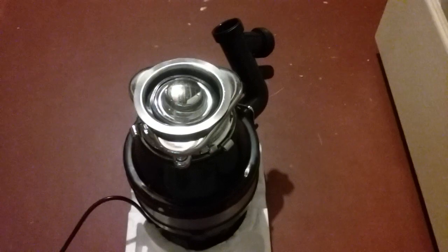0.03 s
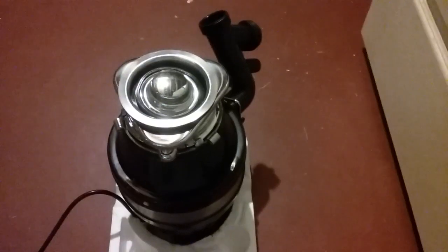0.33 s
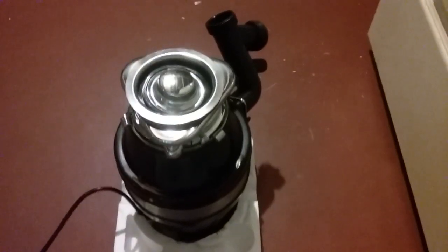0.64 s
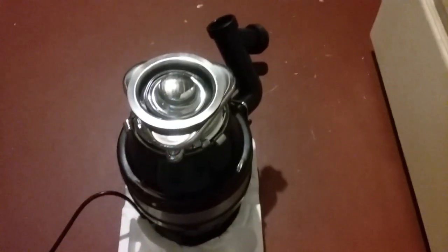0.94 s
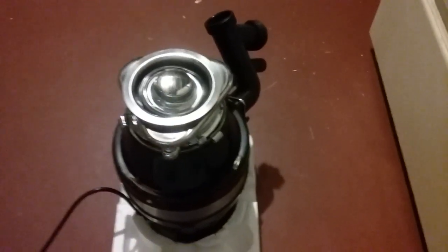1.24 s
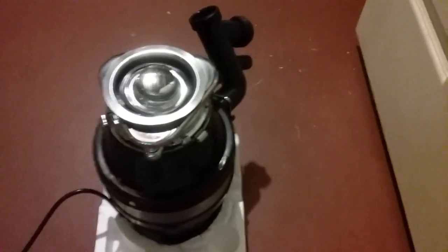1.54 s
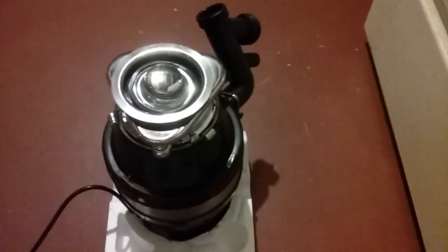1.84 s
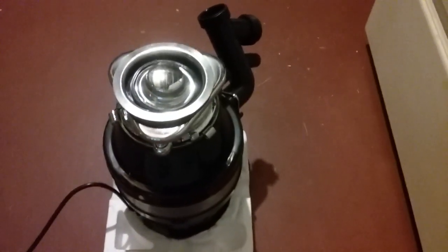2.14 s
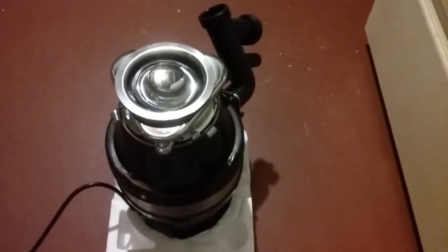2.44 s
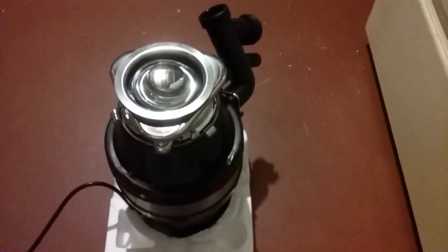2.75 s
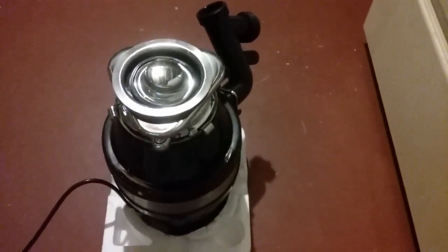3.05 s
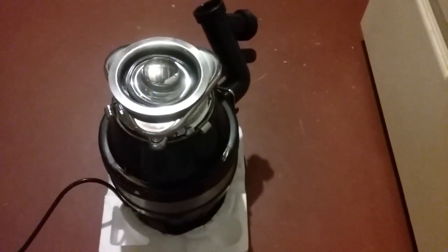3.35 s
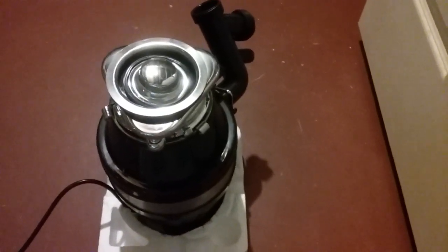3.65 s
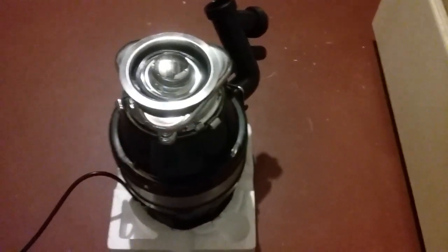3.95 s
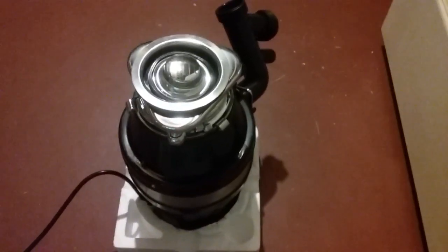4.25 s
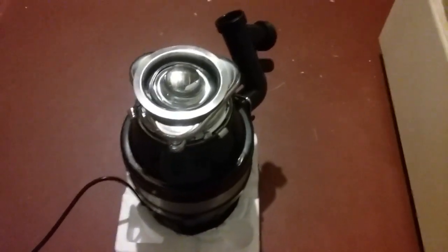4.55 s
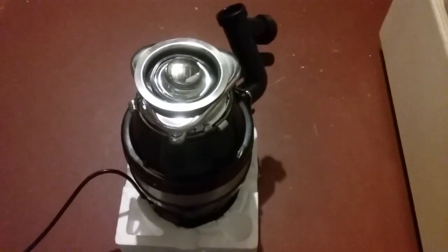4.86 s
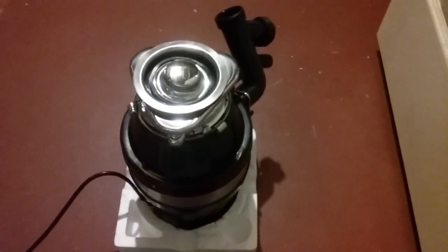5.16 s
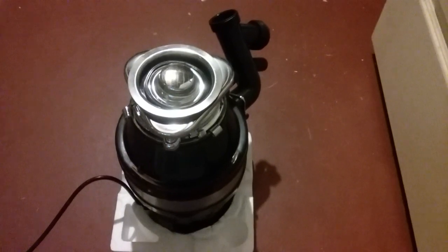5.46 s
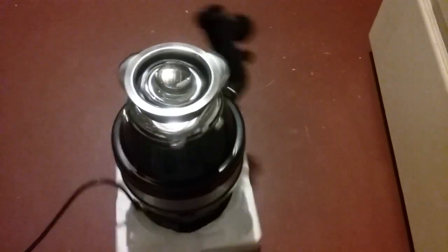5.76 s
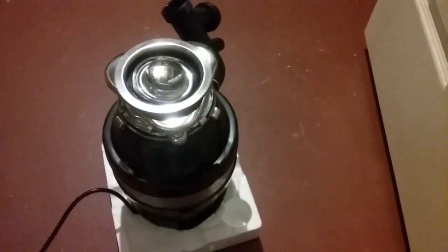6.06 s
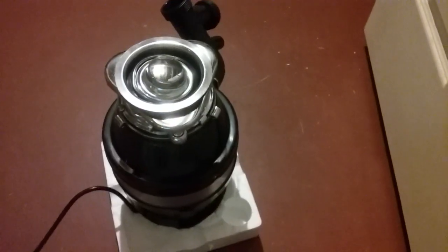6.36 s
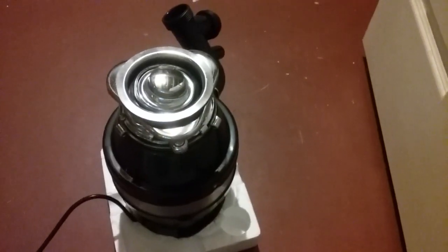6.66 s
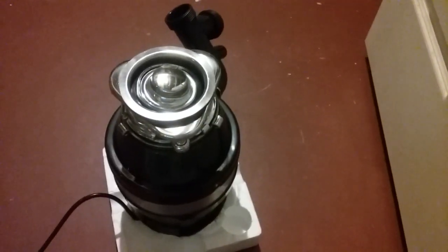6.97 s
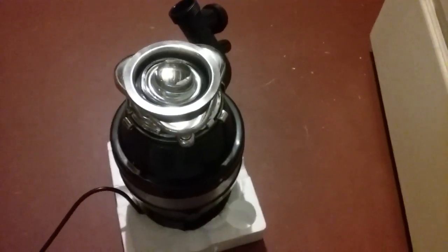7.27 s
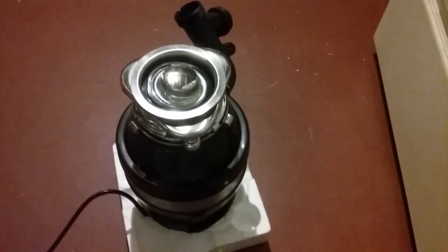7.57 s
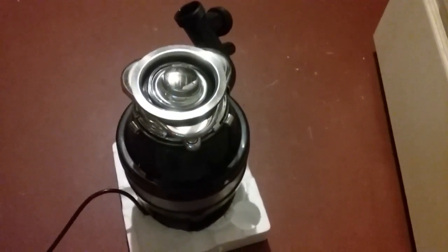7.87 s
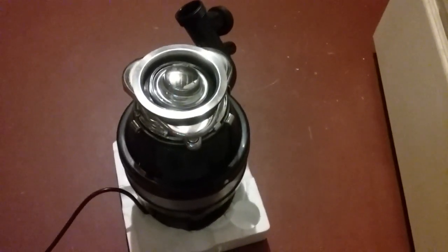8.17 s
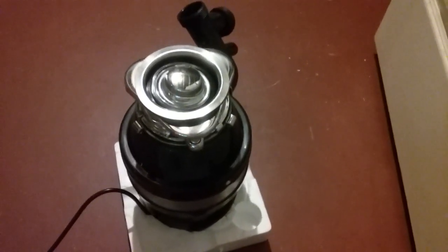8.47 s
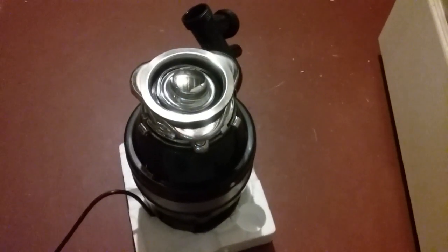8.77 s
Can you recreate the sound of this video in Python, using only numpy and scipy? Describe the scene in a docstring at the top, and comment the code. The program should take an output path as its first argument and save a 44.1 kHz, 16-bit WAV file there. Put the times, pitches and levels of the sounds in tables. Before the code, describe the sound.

An empty garbage disposal clanks on in a quiet room and runs with a whining, rattling whir until a switch clicks.

```python
"""In a quiet room, an empty garbage disposal stands on a foam block close to a hand-held camera.
Switched on, its swivel lugs fly outward and clank against their stops. The turntable scrapes the rim
once a turn, rattling the lugs; the motor whines at multiples of shaft speed over a rush of air, bearing
tones and hum. A click cuts the power and friction starts to slow the shaft. The hand on the camera
makes a few ticks and thumps over faint room tone."""
import sys
import numpy as np
from scipy import signal
from scipy.fft import rfft, irfft, next_fast_len
from scipy.io import wavfile
from scipy.ndimage import uniform_filter1d, map_coordinates

SR = 44100
rng = np.random.default_rng(int(sys.argv[2]) if len(sys.argv) > 2 else 0)


def master_out(mix):
    """Clip the mix to full scale and print it as 16-bit PCM to the path in sys.argv[1]."""
    frames = np.transpose(np.atleast_2d(mix))
    ceiling = np.clip(frames, -1, 1)
    pcm = np.round(ceiling * 32767).astype(np.int16)
    wavfile.write(sys.argv[1], SR, pcm)


N = 398223
ON_S, OFF_S = 5.84, 8.79  # power on, power off
TOUCH_S = 8.2139  # one touch of the rim, the origin of the shaft angle
FULL_SPEED_HZ, MAINS_HZ = 53.031, 60


def motor():
    """Rotating machinery: the shaft angle, the integral of its speed, keeps the turning parts in step."""
    speed = shaft_speed()
    pace = speed / FULL_SPEED_HZ
    coasting = after(OFF_S)
    turns = np.cumsum(speed) / SR
    turns -= turns[round(TOUCH_S * SR)]
    sound = rim_scrape(turns, pace) + lug_rattle(turns, pace, coasting) + air_rush(pace)
    sound += whine(turns, speed, coasting) + rotor(turns, speed, coasting)
    return after(ON_S) * (sound + mains_hum(turns) * (1 - coasting))


# A quick pull and a slow creep: speed to gain/Hz, time constant/s
SPIN_UP = [(40.35, .1167), (1.963, .6465)]

def shaft_speed(coast_s=.648):
    """First-order lag: turns a second approach full speed, then decay by friction without power."""
    shortfall = sum(gap * np.exp(-elapsed(ON_S) / lag) for gap, lag in SPIN_UP)
    return (FULL_SPEED_HZ - shortfall) * np.exp(-elapsed(OFF_S) / coast_s)


# Spectrum of the scrape: f/Hz, level/dB
SCRAPE_SPECTRUM = [(50, -19.5), (100, -11.5), (300, -5.5), (700, -12.5), (1000, -12.5), (1400, -10),
                   (2000, 4.5), (3200, -3.5), (3800, -0.5), (4500, 1), (5500, -1), (6400, -2),
                   (6800, -18.5), (9000, -20), (15500, -18.5)]
# Resonances of the grinding chamber: f/Hz, width/Hz, boost/dB
CHAMBER_MODES = [(730, 320, 4.2), (2037, 41, 5.7), (2490, 28, 6.3), (2768, 170, 14.7), (3030, 140, 8.7),
                 (3360, 78, 16.2), (4660, 320, 9.1), (5200, 240, 9.8), (6120, 110, 1.2), (7610, 1430, 10.3),
                 (8470, 290, 13.4), (10660, 1100, 12), (12500, 1400, 14.3), (14640, 440, 14.4)]

def rim_scrape(turns, pace, size=832):
    """Periodic friction: the same rough patch passes every turn, giving a comb of harmonics."""
    touch = contact(np.arange(size) / size, width=.064, tail_db=-13, fall_db=9)
    rim = touch * rng.standard_normal(size)
    for _ in range(30):  # whiten the scratch while keeping the outline of the touch
        local_rms = np.sqrt(np.abs(uniform_filter1d(rim ** 2, size=41, mode="wrap")))
        rim = rim * touch / local_rms
        rim = irfft(np.exp(1j * np.angle(rfft(rim))))
    scratch = map_coordinates(rim, [turns % 1 * size], order=5, mode="grid-wrap")
    scratch *= contact_force(turns, ripple_db=0, scatter_db=.7)
    return amp(-31) * pace ** 2.7 * colour(scratch, SCRAPE_SPECTRUM, CHAMBER_MODES)


# Spectrum of the rattle: f/Hz, level/dB
RATTLE_SPECTRUM = [(300, -35), (1200, -14.5), (2000, -8), (3200, -12), (4500, 9), (5500, -9.5), (6500, -14),
                   (8000, -14.5), (15500, -14)]
# Resonances of the turntable: f/Hz, width/Hz, boost/dB
TURNTABLE_MODES = [(2850, 300, 3), (4050, 470, 17.9), (5036, 430, 22.2), (13400, 440, 5)]

def lug_rattle(turns, pace, coasting, loosen_db_per_s=2.5):
    """Impact excitation: each touch shakes the loose lugs on the turntable, differently every time."""
    shake = contact(turns, width=.055, tail_db=-11, fall_db=12)
    shake *= contact_force(turns, ripple_db=3.5, scatter_db=1.3)
    rattle = colour(shake * rng.standard_normal(N), RATTLE_SPECTRUM, TURNTABLE_MODES)
    level_db = -45 + loosen_db_per_s * elapsed(ON_S) - 10 * coasting  # lugs work looser, calm unpowered
    return amp(level_db) * pace ** 6.5 * rattle


def contact(turns, width, tail_db, fall_db):
    """Pulse and decay: the envelope of a short touch and of ringing that falls fall_db over a turn."""
    angle = (turns + .5) % 1 - .5
    ringing = amp(tail_db - fall_db * (turns % 1))
    return np.sqrt(np.exp(-(angle / width) ** 2) + ringing ** 2)


def contact_force(turns, ripple_db, scatter_db):
    """Amplitude modulation: touches vary by chance and with torque ripple at twice the mains rate."""
    turn = np.floor(turns + .2).astype(int)
    turn -= turn.min()
    scatter = rng.standard_normal(turn.max() + 1)[turn]
    torque = np.cos(2 * np.pi * 2 * MAINS_HZ * (np.arange(N) / SR - TOUCH_S)) * (1 - after(OFF_S))
    angle = (turns + .5) % 1 - .5
    touching = np.exp(-(angle / .16) ** 2)
    return amp(touching * (ripple_db * torque + scatter_db * scatter))


# Partials of the whine: multiple of shaft speed, level/dB
WHINE_ORDERS = [(16, -14.5), (32, 0.5), (48, -9.5)]
# Swells and a dip on the way up: shaft speed/Hz, width/Hz, boost/dB
WHINE_SWELL = [(43.5, 8, 4.5), (50.59, 2.9, 9.5), (52.49, 0.83, -4.5)]

def whine(turns, speed, coasting):
    """Shaft harmonics: the motor's whine swells during spin-up and stands out while coasting."""
    level_db = -40.5 + bumps(speed, WHINE_SWELL) * (1 - coasting) + 4.5 * coasting
    return amp(level_db) * wavering(turns, WHINE_ORDERS, slip=.0005, waver_db=1.8)


# Spectrum of the rushing air: f/Hz, level/dB
AIR_SPECTRUM = [(30, -50), (80, -21), (130, -11), (250, -10), (500, -8.5), (750, -4), (1000, -12.5),
                (1400, 2), (2000, -4), (2600, -4), (5000, -13.5), (8000, -18.5), (15500, -28)]
# Resonances of the cavity: f/Hz, width/Hz, boost/dB
CAVITY_MODES = [(1046, 210, 10.7), (1578, 43, 3.5), (2330, 28, 1.7), (4170, 450, 10.2), (4900, 280, 10.8),
                (6100, 99, 11.8)]

def air_rush(pace, strain_s=.24):
    """Cavity resonance colours air noise that grows with speed, with an extra rush as the motor pulls."""
    strain = amp(-27) * np.exp(-elapsed(ON_S) / strain_s)
    strength = np.hypot(amp(-37) * pace, strain)
    return strength * colour(rng.standard_normal(N), AIR_SPECTRUM, CAVITY_MODES)


# Unbalance and a faint high whistle: multiple of shaft speed, level/dB
SHAFT_ORDERS = [(2, -61.5), (3, -64), (4, -51), (30, -53.5)]
# Tones of the rolling balls, some inharmonic: multiple of shaft speed, level/dB
BEARING_ORDERS = [(6, -59), (8, -56), (14, -55.5), (15, -56.5), (18, -60), (20.5, -46), (22.6, -54),
                  (28, -58.5), (29.7, -51)]
# Where they cross a resonance of the turntable: shaft speed/Hz, width/Hz, boost/dB
BEARING_SWELL = [(50.5, 2.35, 6.5)]

def rotor(turns, speed, coasting):
    """Forced vibration: unbalance and ball bearings give tones that grow steeply with speed."""
    pace = speed / FULL_SPEED_HZ
    bearing = pace ** 6.1 * wavering(turns, BEARING_ORDERS, slip=.0087, waver_db=2)
    resonance = amp(bumps(speed, BEARING_SWELL) * (1 - coasting))
    return pace ** 2.1 * tones(turns, SHAFT_ORDERS) + resonance * bearing


# Magnetic hum: multiple of mains frequency, level/dB
HUM_ORDERS = [(2, -5), (8, -7.5)]

def mains_hum(turns, hum_db=-52, crest_s=8.055):
    """Magnetic forces hum at mains harmonics; one beats with a nearby bearing tone, in phase at crest_s."""
    cycles = MAINS_HZ * (np.arange(N) / SR - crest_s)
    line = amp(hum_db) * np.cos(2 * np.pi * 6 * cycles)
    bearing = amp(-55.5) * np.cos(2 * np.pi * 6.869 * (turns - turns[round(crest_s * SR)]))
    # torque ripple puts a tone twice the mains rate below the whine
    sideband = amp(-51.5) * np.sin(2 * np.pi * (32 * turns - 2 * cycles))
    harmonics = amp(hum_db) * wavering(cycles, HUM_ORDERS, slip=.0019, waver_db=1)
    return np.sqrt(2) * (line + bearing + sideband) + harmonics


# The lugs strike their stops: t/s, level/dB, emphasised f/Hz, T60/s
LUG_BLOWS = [(5.833, -42.5, 1490, .1), (5.841, -11.5, 1580, 0.056), (5.8603, -12.5, 1780, 0.053),
             (5.8654, -10.5, 4700, 0.056), (5.877, -16, 4000, 0.079), (5.8869, -9, 1340, 0.061),
             (5.895, -17.5, 3530, .1), (5.909, -21.5, 3000, .12)]
# They chatter as they settle: t/s, level/dB
LUG_CHATTER = [(6.079, -27), (6.089, -18), (6.097, -22), (6.114, -17), (6.149, -23), (6.158, -22),
               (6.168, -21.5)]

def lug_clanks():
    """Inertia flings the lugs against their stops; the housing shudders and they settle, chattering."""
    out = np.zeros(N)
    for s, db, hz, t60 in LUG_BLOWS:
        blow = steel_strike(hz, emphasis_db=7.5, treble_db=9, t60=t60)
        shudder = steel_strike(hz, emphasis_db=0, treble_db=9, t60=.3)
        add(out, s, amp(db) * (blow + amp(-14.5) * shudder))
    for s, db in LUG_CHATTER:
        add(out, s, amp(db) * steel_strike(hz=5030, emphasis_db=14.5, treble_db=27.5, t60=.022))
    return out


# Spectrum of a blow: f/Hz, level/dB
STRIKE_SPECTRUM = [(59, -53), (100, -24), (214, -34), (530, -12), (956, -16), (1370, -3), (1620, -13),
                   (2180, -2.5), (4020, -10.5), (4370, -7), (4660, -3), (6000, -17.5), (8410, -12),
                   (10400, -28), (15500, -25)]
# Resonances of the housing: f/Hz, width/Hz, boost/dB
HOUSING_MODES = [(332, 100, 18), (488, 130, 14.5), (1350, 130, 4), (3680, 450, 9.5), (4680, 230, 4.5),
                 (8430, 170, 8.5)]
# Ringing of the steel turntable: f/Hz, level/dB, T60/s
STEEL_MODES = [(1033.6, -7, 0.89), (2229, 1, 0.2), (3580, -27, 0.25), (3400, -29, 0.055), (4100, -18, .3),
               (4145, -10, 0.22), (4600, -4, 0.064), (4600, -7, .27), (6330, -19, 0.34), (7200, -26, .2),
               (8200, -37, 0.3), (8393, -42, 0.32)]

def steel_strike(hz, emphasis_db, treble_db, t60):
    """Free vibration: steel on steel sends a crash through the housing and rings the turntable's modes."""
    t = np.arange(SR // 2) / SR
    peaks = HOUSING_MODES + [(hz, hz / 2, emphasis_db), (12500, 6000, treble_db)]
    crash = colour(rng.standard_normal(len(t)), STRIKE_SPECTRUM, peaks) * amp(-60 * t / t60)
    ring = np.zeros(len(t))
    for mode_hz, db, mode_t60 in STEEL_MODES:
        decay = amp(db + rng.normal(0, 3.5) - 60 * t / mode_t60)
        ring += decay * np.sin(2 * np.pi * (mode_hz * t + rng.random()))
    return (crash + amp(-17) * ring) * (1 - np.exp(-t / .00031))


# Spectrum of the click: f/Hz, level/dB
SWITCH_SPECTRUM = [(200, -44), (900, -9), (3000, -12.5), (5500, -10), (8000, -21), (15000, -22)]
# Resonances of the switch case: f/Hz, width/Hz, boost/dB
SWITCH_MODES = [(1780, 220, 13), (3070, 450, 17), (4200, 350, 9)]

def switch_click(at_s=8.7962, t60=.022):
    """Impulse response: the switch snaps open and a few milliseconds of contact ring its small case."""
    t = np.arange(SR // 10) / SR
    burst = rng.standard_normal(len(t)) * amp(-60 * t / t60)
    snap = colour(burst, SWITCH_SPECTRUM, SWITCH_MODES) * (1 - np.exp(-t / .00067))
    return amp(-32) * np.pad(snap, (round(at_s * SR), N))[:N]


# Soft thumps of the hand: t/s, level/dB
HAND_THUMPS = [(.435, -57), (.484, -63), (7.277, -31), (7.38, -35), (7.42, -31), (7.504, -31), (7.668, -29)]
# Finger ticks: t/s, level/dB, centre f/Hz, fall/(dB per octave), T60/s
FINGER_TICKS = [(0.763, -56, 296, 4.5, 0.057), (1.06, -58.5, 300, 4, 0.038), (1.089, -55, 4830, 16, .018),
                (1.788, -66, 300, 11, 0.13), (3.148, -60.5, 1700, 17, .06)]

def handling(thump_hz=88.6, thump_fall_db=16.5):
    """Structure-borne sound: fingers on the camera make a rumble, soft thumps, ticks and one scuff."""
    grip_shift = after(7.18) - after(7.72)
    out = amp(-45) * grip_shift * rub(N, thump_hz, thump_fall_db)
    for s, db in HAND_THUMPS:
        add(out, s, amp(db) * brief_rub(thump_hz, thump_fall_db, rise_s=.005, t60=.077))
    for s, db, hz, fall_db, t60 in FINGER_TICKS:
        add(out, s, amp(db) * brief_rub(hz, fall_db, rise_s=.00091, t60=t60))
    scuff = brief_rub(hz=540, fall_db=6.5, rise_s=.016, t60=.18)
    add(out, .83, amp(-53) * scuff)
    return out


def rub(size, hz, fall_db):
    """Friction noise of skin on the case, falling by fall_db an octave on both sides of hz."""
    hump = [(f, -fall_db * np.hypot(np.log2(f / hz), .5)) for f in np.geomspace(20, 15800, 40)]
    return colour(rng.standard_normal(size), hump, [(11000, 11000, -9)])


def brief_rub(hz, fall_db, rise_s, t60):
    """A friction transient: the rub swells, then decays exponentially."""
    t = np.arange(SR // 2) / SR
    swell = (1 - np.exp(-(t / rise_s) ** 2)) * amp(-60 * t / t60)
    return swell / swell.max() * rub(len(t), hz, fall_db)


# Reverberation time of the room: f/Hz, T60/s
ROOM_DECAY = [(200, 0.78), (2000, 0.56), (6000, 0.11), (14000, 0.7)]

def reverberation(x, delay_samples=220):
    """Diffuse reflection: hard floor and walls return a tail that dies fastest near 6 kHz."""
    hz, t, noise = signal.stft(rng.standard_normal(SR // 2), SR, nperseg=256)
    decay = amp(-60 * t / along(ROOM_DECAY, hz)[:, None])
    tail = signal.istft(noise * decay, SR, nperseg=256)[1]
    return signal.fftconvolve(np.pad(x, (delay_samples, 0)), tail / np.linalg.norm(tail))[:N]


# Spectrum of room tone and microphone hiss: f/Hz, level/dB
FLOOR_SPECTRUM = [(18, -51), (30, -9), (32, -12), (61, 1), (85, 0.5), (152, -3.5), (277, -2.5), (455, -8.5),
                  (874, -11.5), (2830, -19.5), (6210, -22), (9680, -18.5), (15500, -20.5)]

def room_tone(wake_s=.41, rise_s=.093):
    """The noise floor: steady broadband noise, heard once the microphone fades in."""
    fade_in = 1 - np.exp(-elapsed(wake_s) / rise_s)
    return amp(-70.5) * colour(rng.standard_normal(N), FLOOR_SPECTRUM) * fade_in


def colour(x, spectrum, resonances=()):
    """Source and filter: x through a minimum-phase spectrum with resonant bumps, scaled to rms 1."""
    size = 2 * next_fast_len(len(x) // 2 + 4096)
    hz = np.fft.rfftfreq(size, 1 / SR)
    db = along(spectrum, hz) + bumps(hz, resonances)
    cepstrum = irfft(np.log(amp(db)))
    cepstrum[1:size // 2] *= 2  # folding the cepstrum makes the filter causal
    cepstrum[size // 2 + 1:] = 0
    shaped = irfft(rfft(x, size) * np.exp(rfft(cepstrum)), size)[:len(x)]
    return shaped / np.sqrt(np.mean(shaped ** 2) + 1e-20)


def tones(turns, orders):
    """Superposition of sines on multiples of a rotation, each at its rms level."""
    return sum(amp(db) * np.sqrt(2) * np.sin(2 * np.pi * (k * turns + rng.random())) for k, db in orders)


def wavering(turns, orders, slip, waver_db):
    """Random modulation: each tone wanders in phase (slip, in turns) and in level."""
    return sum(tones(turns + slip * wobble(22), [order]) * amp(waver_db * wobble(20)) for order in orders)


def wobble(rate):
    """A smooth random curve, rate knots a second."""
    return map_coordinates(rng.standard_normal(int(N * rate / SR) + 4), [np.arange(N) * rate / SR])


def bumps(at, peaks):
    """Summed dB of bell-shaped (centre, width, boost) peaks."""
    return sum(boost * .5 ** ((2 * (at - centre) / width) ** 2) for centre, width, boost in peaks)


def along(points, hz):
    """Interpolation of (f, value) points on a log frequency axis."""
    f, value = np.transpose(points)
    return np.interp(np.log(hz + 1), np.log(f + 1), value)


def amp(db):
    """Decibels to gain."""
    return 10 ** (np.asarray(db) / 20)


def after(s):
    """A 20 ms ramp from 0 to 1 at time s."""
    return np.clip((np.arange(N) / SR - s) / .02, 0, 1)


def elapsed(s):
    """Seconds since time s, zero before it."""
    return np.maximum(np.arange(N) / SR - s, 0)


def add(out, s, sound):
    """Mix a sound into out at time s."""
    part = out[round(s * SR):][:len(sound)]
    part += sound[:len(part)]


# Side signal relative to mid: f/Hz, level/dB
STEREO_SPREAD = [(100, -36), (3000, -70.5), (6000, -52.5), (10000, -34), (15500, -29.5)]

def scene():
    """Superposition: all sources lie straight ahead, with a slight phase difference between channels."""
    clanks = lug_clanks()
    background = room_tone()
    mid = motor() + clanks + switch_click() + amp(-13.5) * reverberation(clanks) + handling() + background
    size = next_fast_len(N + SR)
    spread = amp(along(STEREO_SPREAD, np.fft.rfftfreq(size, 1 / SR)))
    side = irfft(rfft(mid, size) * 1j * spread, size)[:N]
    return np.array([mid + side, mid - side])


def record(dry, low_hz=52, top_hz=15800):
    """Band limiting: the small microphone loses the deepest bass, the camera the highest treble."""
    highpass = signal.butter(N=3, Wn=low_hz, btype="highpass", fs=SR, output="sos")
    thin = signal.sosfilt(highpass, dry)
    size = next_fast_len(N + SR)
    passband = np.clip((top_hz - np.fft.rfftfreq(size, 1 / SR)) / 100 + .5, 0, 1)
    return irfft(rfft(thin, size) * passband, size)[:, :N]


dry = scene()
out = record(dry)
master_out(out)
```